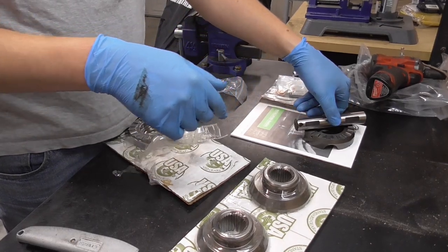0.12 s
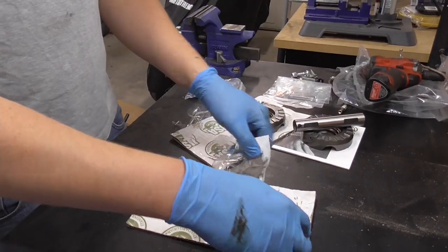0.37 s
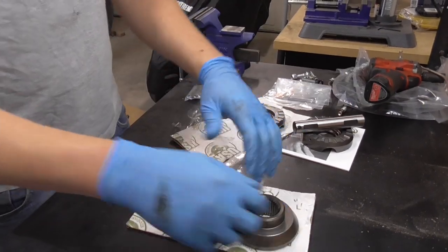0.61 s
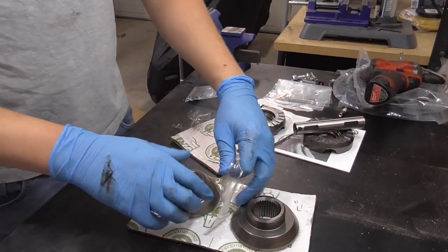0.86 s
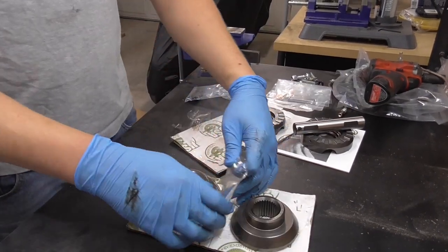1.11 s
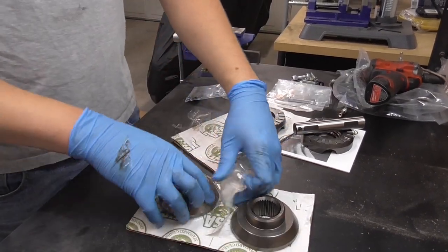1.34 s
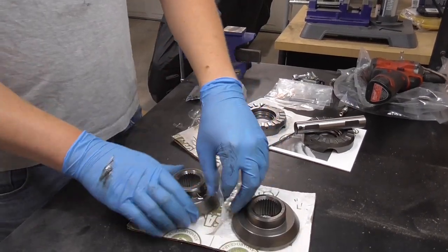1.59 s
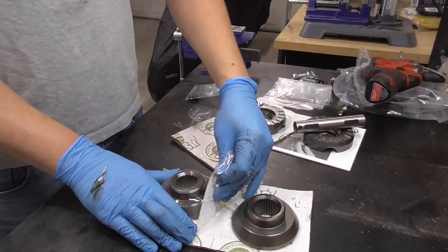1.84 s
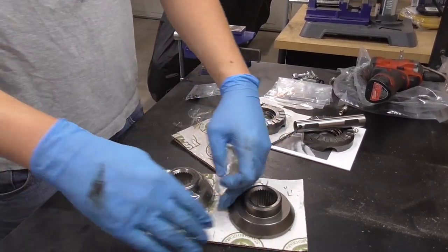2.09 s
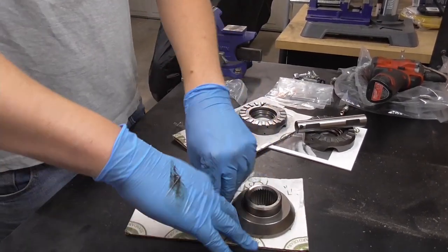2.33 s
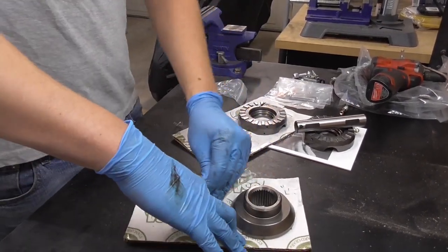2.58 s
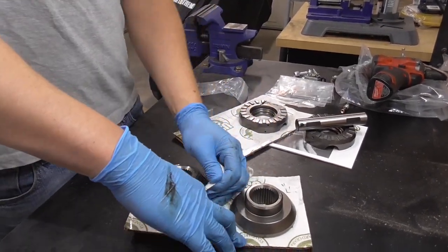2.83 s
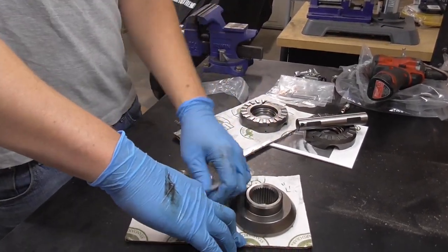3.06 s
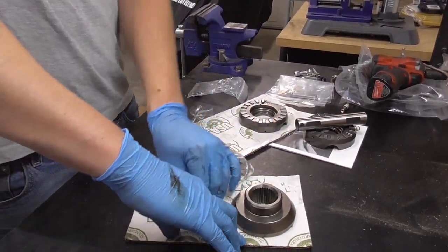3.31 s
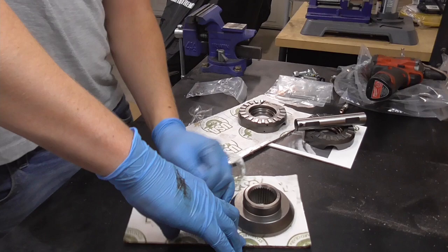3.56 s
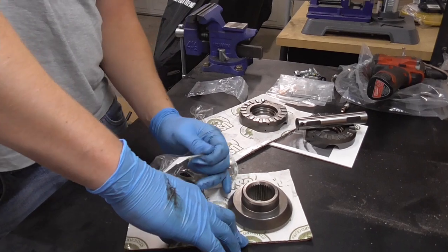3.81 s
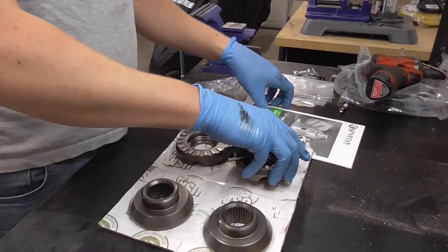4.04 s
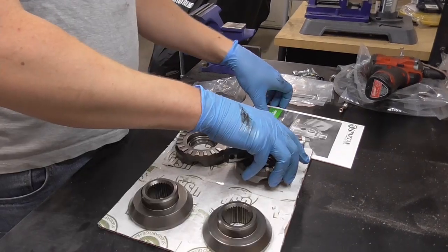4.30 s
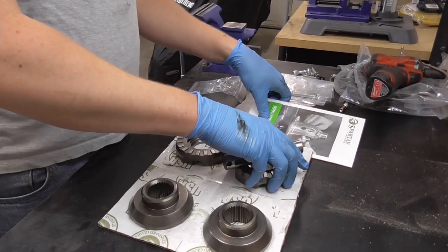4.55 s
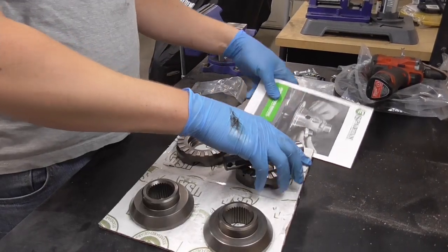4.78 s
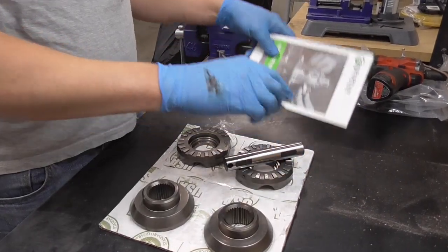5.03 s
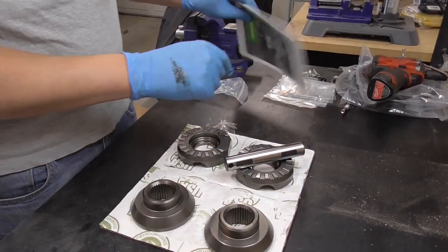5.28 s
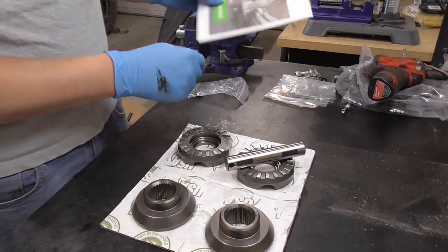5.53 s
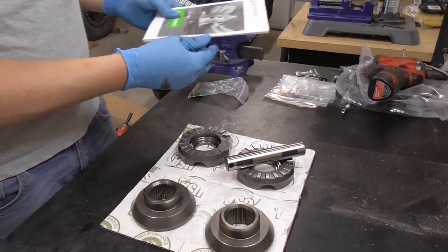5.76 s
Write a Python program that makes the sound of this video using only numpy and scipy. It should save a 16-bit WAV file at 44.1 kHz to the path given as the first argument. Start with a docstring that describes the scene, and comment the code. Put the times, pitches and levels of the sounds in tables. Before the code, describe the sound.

Close stereo recording in a quiet, humming workshop with a short echo. A faint paper slide, then heavy metal parts thump the bench. Stiff plastic film is tugged in bursts of crackle, sharp snaps and hollow card pops. Near four seconds a steel pin clinks on a gear; a hard, deep thump follows, then paper slides away and only air remains.

```python
"""Peeling film off steel gears

Gloved hands peel stiff plastic film off steel gears on a cardboard sheet on a workbench.
The film crackles (clumps of tiny noise puffs) and snaps (single puffs); the card rubs and pops
(short dying tones); gears thump the bench and a steel pin clinks on a gear (sums of dying sines).
A leaflet slides away as a hiss; a quiet workshop hums behind as coloured noise, with a short echo."""
import sys
import numpy as np
from scipy import signal
from scipy.fft import rfft, irfft, next_fast_len
from scipy.io import wavfile
from scipy.ndimage import uniform_filter1d

SR = 44100
rng = np.random.default_rng(int(sys.argv[2]) if len(sys.argv) > 2 else 0)


def boost_factor(decibels):
    """Convert a level in decibels to a linear amplitude factor."""
    exponent = np.asarray(decibels, float) / 20
    return 10 ** exponent


def put_to_file(sound):
    """Save the sound as 16-bit audio at rate SR, in the file named by the first command-line argument."""
    columns = np.atleast_2d(sound).T  # one column per channel
    safe = np.clip(columns, -1, 1)
    whole_steps = np.round(safe * 32767)
    wavfile.write(sys.argv[1], SR, whole_steps.astype(np.int16))


N = 259734
T = np.arange(N) / SR


def evened(x):
    """Scales to rms 1."""
    return x / np.sqrt(np.mean(x ** 2) + 1e-20)


def read(points, hz):
    """Reads a table over frequency, with straight lines on a log axis."""
    f, value = np.transpose(points)
    return np.interp(np.log(hz + 1), np.log(f + 1), value)


def coloured(x, points):
    """Filters along time by a spectrum table."""
    size = next_fast_len(N)
    gain = boost_factor(read(points, np.fft.rfftfreq(size, 1 / SR)))
    return irfft(rfft(x, size) * gain, size)[..., :N]


def sides(pan_db):
    """Gains of the left and right ports from left minus right in dB."""
    return boost_factor(np.multiply.outer([.5, -.5], pan_db))


def add(mix, s, sound):
    """Mixes a sound in at time s."""
    part = mix[..., round(s * SR):][..., :sound.shape[-1]]
    part += sound[..., :part.shape[-1]]


def ring(modes, length):
    """Sum of sines that die away, each losing 60 dB in its own t60."""
    t = T[:round(length * SR)]
    return sum(boost_factor(db - 60 * t / t60) * np.sin(2 * np.pi * hz * t) for hz, db, t60 in modes)


def grains(per_s, spread_db, clump_db, decay_s, same):
    """Tiny cracks of uneven size in clumps; each is a short dying puff, partly unlike at the two ports."""
    clumps = evened(uniform_filter1d(rng.standard_normal(N), 500))
    size = boost_factor(spread_db * np.minimum(rng.exponential(1, N), 4) + clump_db * clumps)
    starts = rng.random(N) < per_s / SR
    power = signal.lfilter([1], [1, -np.exp(-2 / (decay_s * SR))], size ** 2 * starts)
    both, left, right = rng.standard_normal((3, N))
    return np.sqrt(power) * (np.sqrt(same) * both + np.sqrt(1 - same) * np.array([left, right]))


def radiated(x):
    """A bench top pushes little air below its first mode."""
    return signal.sosfilt(signal.butter(4, 115, "high", fs=SR, output="sos"), x)


# colour of the workshop air: (f/Hz, level/dB per Hz)
HUM = [(15, -42), (25, -5.5), (134, 4.5), (516, -5), (607, -7), (1020, -11), (1790, -26), (5140, -32.5),
       (6050, -40), (6560, -32), (10100, -29), (14800, -28), (16000, -49)]
# how alike the air is at left and right: (f/Hz, likeness 0 to 1)
SAME = [(60, 0.98), (240, 0.79), (950, 0.43), (3770, 0.17), (15000, 0.099)]


def hum():
    """Steady workshop air: noise with a slow waver, more alike at the two ports in the bass."""
    left, other = (rfft(v) for v in rng.standard_normal((2, N)))
    same = read(SAME, np.fft.rfftfreq(N, 1 / SR))
    air = irfft([left, same * left + np.sqrt(1 - same ** 2) * other], N)
    waver_db = 0.26 * evened(uniform_filter1d(rng.standard_normal(N), 6000))
    return boost_factor(-55 + waver_db) * evened(coloured(air, HUM))


# how fast the workshop echo dies: (f/Hz, t60/s)
SHOP = [(150, 0.07), (600, 0.3), (2500, 0.53), (8000, 0.35), (15000, 0.035)]


def shop(x):
    """Sparse echoes of random sign, each band dying at its own speed."""
    taps = np.zeros((2, SR // 2))
    slots = np.arange(160, SR // 2 - 20, 20)  # one echo in every 20 samples
    at = slots + rng.integers(0, 20, (2, len(slots)))
    np.put_along_axis(taps, at, rng.choice([-1., 1.], at.shape), 1)
    hz, t, z = signal.stft(taps, SR, nperseg=256)
    tail = signal.istft(z * boost_factor(-60 * t / read(SHOP, hz)[:, None]), SR, nperseg=256)[1]
    return signal.fftconvolve(x[None], tail / np.linalg.norm(tail[0]), axes=1)[:, :N]


# deep pushes: (t/s, level/dB at the right port, f/Hz)
JOLTS = [(1.83, -52, 35), (4.612, -15, 36)]


def jolts():
    """One slow dying swing for each push, felt mostly at the right port."""
    out = np.zeros(N)
    for s, db, hz in JOLTS:
        add(out, s, ring([(hz, db, .06)], .2))
    return out * np.array([[.3], [1]])


# ways the bench top vibrates: (f/Hz, relative level/dB, t60/s)
BENCH = [(134.5, -9, 0.35), (171.8, 1, 0.13), (220, -7, 0.075), (236, -14, 0.59), (137, 5.5, 0.029),
         (252.8, 7, 0.044), (308, -4, 0.051), (366, -9.5, 0.082), (530, 0, 0.045), (664, -3, 0.018),
         (985, -24, 0.081), (1210, -20, 0.045)]


def bench_rumble():
    """Grains of rubbing and weight shake the bench top, which answers with its own modes."""
    rumble = signal.oaconvolve(grains(170, 4.25, 0.82, 0.014, 0.99), ring(BENCH, 0.53)[None])[:, :N]
    return evened(radiated(rumble))


# weight landing on the bench: (t/s, blow level/dB, contact/s, favoured f/Hz at the spot struck)
THUMPS = [(0.572, -9.5, 0.0024, 260), (0.579, -9.5, 0.0033, 209), (0.606, -13.5, 0.0035, 157),
          (0.618, -12, 0.0072, 134), (0.656, -25, 0.0036, 155), (0.671, -23.5, 0.0022, 200),
          (0.699, -20, 0.0049, 207), (0.715, -25.5, 0.0033, 232), (0.761, -32.5, 0.0024, 200),
          (1.825, -40, 0.0025, 166), (2.361, -33, 0.0052, 147), (3.075, -14.5, 0.0052, 160),
          (3.088, -28, 0.0018, 171), (3.137, -29.5, 0.0044, 136), (3.488, -30, 0.0051, 167),
          (3.76, -31, 0.0034, 137), (3.961, -33.5, 0.0034, 220), (4.003, -34.5, 0.0036, 250),
          (4.019, -34.5, 0.0027, 244), (4.036, -38, 0.0036, 199), (4.064, -34, 0.0017, 210),
          (4.105, -46, 0.003, 220), (4.21, -37, 0.0056, 160), (4.317, -44, 0.0035, 200),
          (4.343, -43, 0.0027, 230), (4.517, -29.5, 0.0033, 151), (4.542, -28, 0.0028, 194),
          (4.562, -19.5, 0.002, 161), (4.611, -5, 0.0036, 214), (4.625, -11, 0.0031, 220),
          (4.641, -27, 0.003, 135)]
# how far the left port runs ahead of the right: (f/Hz, phase/radians)
LEAD = [(60, .8), (150, .36), (300, .42), (1000, .3)]


def thumps():
    """A soft push through the card sets the bench top ringing; the spot struck favours some modes."""
    out = np.zeros(N)
    for s, db, contact, spot_hz in THUMPS:
        push = np.hanning(max(round(contact * SR), 4))
        edge = np.hanning(40)  # the steel rim lands harder than the body
        drive = np.concatenate([boost_factor(-17.0) * edge / edge.sum(), np.zeros(len(push))])
        drive[:len(push)] += push / push.sum()
        modes = [(hz, d - min(60.0 * np.log2(hz / spot_hz) ** 2, 12.0), t60) for hz, d, t60 in BENCH]
        add(out, s, boost_factor(db) * np.convolve(ring(modes, .6), drive))
    turn = np.exp(.5j * np.outer([1, -1], read(LEAD, np.fft.rfftfreq(N, 1 / SR))))
    return irfft(rfft(radiated(out)) * turn, N)


# contacts that damp earlier ringing: (t/s, level/dB before the share each part takes)
GRIP = [(3.964, -5), (3.972, -8), (4.02, -4), (4.064, -4), (4.145, -7), (4.18, -6), (4.232, -7), (4.36, -8),
        (4.41, -3), (4.47, -18), (4.56, -10), (4.6, -4), (4.612, -13), (4.636, -8), (4.712, -8)]


def struck(taps, modes, grip_share):
    """Each touch rings the families of modes by its own amounts; later contacts damp the ring."""
    swell_s, grip_s = .0012, .007  # a ring builds up, and a grip closes, over a moment
    out, t = np.zeros(N), T[:2 * SR]
    families = [ring(family, 2) * (1 - np.exp(-t / swell_s)) for family in modes]
    for s, *levels_db in taps:
        damped_db = sum(db * np.clip((s + t - at) / grip_s, 0, 1) for at, db in GRIP if at > s + .01)
        sound = sum(boost_factor(db) * family for db, family in zip(levels_db, families))
        add(out, s, boost_factor(grip_share * damped_db) * sound)
    return out


# pin against gear, push into each family of gear modes:
# (t/s, low ring level/dB, middle ring level/dB, high ring level/dB, short bright rings level/dB)
CLINKS = [(3.9601, -37, -40.5, -29.5, -26), (4.065, -53, -48, -40, -52), (4.085, -63, -70, -36.5, -70),
          (4.1814, -44.5, -43.5, -65, -64), (4.3625, -30.5, -54, -47, -43.5),
          (4.378, -34, -50, -40.5, -41.5), (4.528, -41, -52, -58, -56), (4.547, -32.5, -55, -50, -50),
          (4.5643, -60, -37.5, -36, -36), (4.592, -53, -50, -61, -57), (4.6411, -48, -33.5, -53, -60),
          (4.677, -58, -35.5, -60, -63)]
# gear modes by family, in that order: (f/Hz, relative level/dB, t60/s)
STEEL = [
    [(4504, 0, 0.4), (4535, -14, .15)],
    [(5667, 3, 0.17), (5610, -7, .1), (5040, -12, .08)],
    [(7697, 0, 0.5), (7752, -10, 0.3), (7950, -10, .2)],
    [(7325, -1, 0.15), (8866, -16, .06), (9400, -13, .04), (10480, -13, .05), (11080, -13, .06),
     (11330, 0, 0.12), (11500, 0, 0.04), (14050, -14, 0.13)],
]
# the pin itself answering: (t/s, low ring level/dB, middle rings level/dB, bright rings level/dB)
PIN_TAPS = [(3.9601, -60, -51, -50), (4.1814, -54, -52, -59), (4.547, -38, -54, -58),
            (4.5643, -30.5, -66, -35), (4.6411, -34, -45.5, -42), (4.677, -55, -68, -60)]
# pin modes by family, in that order: (f/Hz, relative level/dB, t60/s)
PIN = [
    [(4459, 0, .33)],
    [(6286, 0, .5), (6262, -6, 3.2)],
    [(7303, 0, .2), (8880, -9, .15), (11755, -2, .1)],
]


def clinks():
    """Gear and pin ring as dying sines; the level of the rings wavers a little at random."""
    waver_db = 1.2 * evened(uniform_filter1d(rng.standard_normal(N), 400))
    gear = struck(CLINKS, STEEL, 0.86)
    pin = struck(PIN_TAPS, PIN, 0.75)  # the pin is held less
    return (gear + pin) * boost_factor(waver_db)


# card buckling: (t/s, level/dB, pitch f/Hz, t60/s, left minus right level/dB)
POPS = [(0.521, -24, 610, 0.029, -2.5), (0.569, -20.5, 1390, 0.013, -3), (0.581, -13.5, 517, 0.051, 5),
        (0.584, -18.5, 800, 0.023, -6), (0.603, -19.5, 408, 0.026, -3), (0.64, -24, 536, 0.019, -0.5),
        (0.682, -25, 530, 0.058, 0), (0.684, -31, 1530, 0.019, -3), (0.696, -17, 1700, 0.0092, -7),
        (0.699, -23, 765, 0.013, -8), (0.723, -29, 530, 0.027, 2), (0.78, -26, 684, 0.012, -3),
        (0.852, -27.5, 1166, 0.043, -6), (0.869, -27.5, 560, 0.03, -4), (0.924, -19.5, 620, 0.01, -4),
        (0.948, -16, 604, 0.0089, -3), (0.958, -11, 950, 0.015, -8), (0.959, -15.5, 526, 0.018, -1),
        (1.275, -17.5, 1400, 0.0048, -10), (1.276, -14.5, 814, 0.0094, -5.5),
        (1.364, -26, 830, 0.019, -1.0), (1.599, -17, 1350, 0.011, -5), (1.664, -22.5, 1200, 0.014, -7),
        (1.678, -8, 1250, 0.0082, -11.5), (1.701, -11.5, 908, 0.02, -2.5), (1.823, -13, 585, 0.013, -6.5),
        (1.833, -16, 1940, 0.017, -9), (1.864, -18, 1150, 0.0088, -5), (2.074, -5, 1290, 0.0077, -3.5),
        (2.189, -10, 1260, 0.015, -6), (2.191, -21, 550, 0.027, -2), (2.22, -22, 530, 0.019, 1),
        (2.322, -20, 1070, 0.011, -8), (2.547, -28.5, 525, 0.019, -6), (2.609, -6.5, 1390, 0.0098, -3),
        (2.659, -22.5, 500, 0.036, 0), (2.687, -18.5, 1210, 0.012, -6), (2.855, -14.5, 1220, 0.014, -5),
        (2.892, -25.5, 1375, 0.022, -4.5), (3.073, -24.5, 500, 0.063, 1), (3.084, -19, 1000, 0.011, -6),
        (3.158, -14.5, 1360, 0.0078, 2), (3.188, -31, 1390, 0.034, -7), (3.373, -11.5, 1500, 0.0048, -6.5),
        (3.405, -11.5, 1370, 0.0075, -4), (3.431, -15.5, 1250, 0.0063, 1.5), (3.471, -18, 530, 0.028, 1.5),
        (3.494, -20, 610, 0.026, -4), (3.585, -8, 633, 0.017, -6.5), (3.585, -10, 1267, 0.017, -3.5),
        (3.648, -22, 1150, 0.0063, -2.5), (3.662, -11, 1300, 0.0079, -1), (3.673, -11, 1440, 0.015, -5.5),
        (3.683, -24.5, 1400, 0.007, -2), (3.693, -18.5, 1510, 0.007, -3), (3.764, -22, 1440, 0.018, -2.5),
        (3.96, -33, 1170, 0.051, -5), (3.964, -25, 1546, 0.025, -2), (4.181, -28.5, 1210, 0.035, -3),
        (4.185, -24.5, 1550, 0.011, -8), (4.277, -37.5, 1140, 0.031, -2), (4.542, -29, 1190, 0.021, -3),
        (4.611, -22, 650, .025, -3), (4.612, -24.5, 1990, 0.014, -3), (4.626, -9.5, 410, 0.015, -2),
        (5.025, -36, 824, 0.028, -4)]
# what pops leave ringing in the card, weaker far from their pitch: (f/Hz, level/dB, t60/s)
CARD_MODES = [(530, -20, .04), (760, -24, .025), (955, -21, .045), (1180, -23, .03), (1300, -23, .03),
              (1550, -25, .025)]


def pops():
    """The card buckles: a few cycles at one pitch, two weaker neighbours, a dull scratch, its own modes."""
    out, t = np.zeros((2, N)), T[:3000]
    length = len(t) / SR
    noise = rng.standard_normal((len(POPS), len(t)))
    spot_db = 4.0 * rng.standard_normal((len(POPS), len(CARD_MODES)))  # each spot favours other modes
    for (s, db, hz, t60, pan_db), a, spot in zip(POPS, noise, spot_db):
        buckle = ring([(hz, 0, t60), (hz * 0.673, -6, t60 * 0.42), (hz * 1.2, -5, t60 * 0.43)], length)
        modes = [(f, d + g - 14.0 * np.log2(f / hz) ** 2, w) for (f, d, w), g in zip(CARD_MODES, spot)]
        body = buckle + ring(modes, length)
        dull = signal.sosfilt(signal.butter(4, hz * 2.25, fs=SR, output="sos"), a)
        scratch = evened(dull) * boost_factor(-10.0 - 60 * t / t60)
        onset = 1 - np.exp(-t / 0.0012)
        add(out, s, boost_factor(db) * onset * (body + scratch) * sides(pan_db)[:, None])
    return radiated(out)


# colour of the rubbed card: (f/Hz, level/dB per Hz)
CARD = [(150, -40), (250, -9.5), (349, -2.5), (512, 9.5), (760, 2), (950, 7), (1200, 5.5), (1500, -0.5),
        (1900, -2), (3000, -9.5), (7000, -13)]


def card_rub():
    """Rubbed card: coarse grains, nearly alike at both ports."""
    return evened(coloured(grains(700, 3.5, 2.0, .004, .8), CARD))


# colour of the paper: (f/Hz, level/dB per Hz)
PAPER = [(700, -32), (1100, -8), (1700, 2), (2400, 0), (3480, 4), (11000, 6), (15400, 4), (16500, -60)]


def paper_hiss():
    """Sliding and flexing paper: many fine grains that blend into a hiss."""
    return evened(coloured(grains(2000, 2.6, 2.2, 0.0014, 0.3), PAPER))


def patchy(x):
    """Random patches of about 2 kHz by 40 ms brighten and dull the sound."""
    z = signal.stft(x, nperseg=256)[2]
    patches = rng.standard_normal(z.shape[:0:-1]).T
    patches = uniform_filter1d(patches, size=12, axis=0)
    patches = evened(uniform_filter1d(patches, size=14, axis=1))
    return evened(signal.istft(z * boost_factor(2.5 * patches), nperseg=256)[1][:, :N])


# colour of the film: (f/Hz, level/dB per Hz)
FILM = [(880, -22), (1500, -1), (1830, -17), (3410, -7.5), (4570, -8), (5700, -7), (11600, 0.5),
        (15200, -2), (15700, 9), (16500, -56)]


def film_crackle():
    """Stiff film gives a dense crackle with sparser, sharper ticks; its colour drifts in patches."""
    crackle = evened(grains(3000, 2.9, 1.5, 0.0012, 0.4))
    ticks = boost_factor(-3.5) * evened(grains(450, 3.3, 2.5, .0004, .5))
    return patchy(coloured(crackle + ticks, FILM))


def strokes(table):
    """Summed gains of treble and card rub: each stroke bites, swells to its top, slackens and is let go."""
    bite_db, slack_db = -14, -15  # a stroke starts and ends this far under its top
    outside_db = -120.2  # further drop 0.1 s before the bite or after letting go
    t, power = T[::32], 0
    for start, swell, fade, *top_db in table:
        shape_db = np.interp(t - start, [-.1, 0, swell, swell + fade, swell + fade + .1],
                             [bite_db + outside_db, bite_db, 0, slack_db, slack_db + outside_db])
        power = power + boost_factor(np.add.outer(top_db, shape_db)) ** 2
    return [np.interp(T, t, np.sqrt(p)) for p in power]


# hands resting and shifting on the work: (t/s, faint rustle level/dB, weight on card and bench level/dB)
HANDS = [(0.0, -60.5, -46), (0.23, -57.5, -44.5), (0.33, -65, -57.5), (0.42, -65, -46.5), (0.53, -61, -54),
         (0.6, -62, -39.5), (0.77, -70, -38.5), (0.82, -41.5, -49), (1.02, -59, -65), (1.2, -47.5, -47.5),
         (1.4, -65, -52.5), (1.84, -56, -44), (1.89, -59, -60), (2.2, -34, -45.5), (2.42, -70, -46),
         (2.75, -59, -53), (3.05, -49.5, -53), (3.1, -44.5, -49), (3.4, -73, -47), (3.64, -45.5, -48),
         (3.78, -57, -44), (3.901, -49.5, -48), (3.92, -109, -61), (3.97, -53, -46.5), (4.1, -60.5, -43.5),
         (4.35, -63, -52), (4.49, -64, -51.5), (4.57, -38.5, -32.5), (4.7, -54, -38.5), (4.9, -58, -53),
         (5.049, -80, -52.5), (5.25, -62, -60.5), (5.42, -70.5, -59.5), (5.89, -80, -59)]
# tugs at the film: (start t/s, swell/s, fade/s, top crackle level/dB, top card rub level/dB)
TUGS = [(0.384, 0.012, 0.0068, -33, -43.5), (0.491, 0.035, 0.087, -43.5, -45.5),
        (0.582, .01, 0.05, -66, -55), (0.62, 0.0019, 0.035, -36.5, -63), (0.68, 0.016, 0.054, -37, -55),
        (0.75, 0.017, 0.014, -34, -42), (0.805, 0.018, 0.023, -50, -38.5), (0.846, 0.034, 0.1, -31, -33),
        (0.975, 0.035, 0.19, -61, -45), (1.235, 0.025, 0.12, -38, -43), (1.391, 0.059, 0.16, -34.5, -37),
        (1.589, 0.032, 0.058, -37, -44), (1.66, 0.019, 0.046, -32, -34.5), (1.741, 0.087, 0.056, -27, -36),
        (1.879, 0.013, 0.16, -31.5, -42.5), (2.019, 0.031, 0.11, -29, -37),
        (2.17, 0.011, 0.098, -41, -37.5), (2.35, 0.0024, 0.051, -35, -43.5),
        (2.438, 0.091, 0.067, -22.5, -33.5), (2.649, 0.0069, 0.082, -33, -33),
        (2.72, 0.026, 0.083, -34.5, -42), (2.82, 0.027, 0.094, -31.5, -40),
        (2.94, 0.038, 0.049, -30.5, -41), (3.07, 0.0034, 0.11, -38, -37), (3.15, 0.025, 0.37, -42.5, -40.5),
        (3.428, 0.063, 0.066, -29, -30), (3.55, 0.036, 0.06, -37.5, -36), (3.658, 0.0043, 0.16, -32.5, -31)]
# paper sliding and flexing: (start t/s, swell/s, fade/s, top hiss level/dB, top card rub level/dB)
SLIDES = [(0.228, 0.049, 0.037, -41, -68), (4.52, 0.016, 0.028, -54, -41),
          (4.755, 0.047, 0.039, -41.5, -49), (4.86, 0.092, 0.11, -42.5, -49.5),
          (5.016, 0.012, 0.0086, -48, -47.5), (5.15, 0.0084, 0.018, -57, -72),
          (5.3, 0.044, 0.044, -68, -60.5)]


def handling():
    """Film crackle, paper hiss, card rub and bench rumble follow the strokes and the weight of the hands."""
    film_gone_s = 3.93  # after this only paper rustles under the hands
    s, *columns = np.transpose(HANDS)
    rustle, weight = (boost_factor(np.interp(T, s, c)) for c in columns)
    (crackle, tug_rub), (hiss, slide_rub) = strokes(TUGS), strokes(SLIDES)
    rub = np.hypot(tug_rub, slide_rub)
    # hypot adds the powers of two causes
    film_gain = np.hypot(crackle, rustle * (T < film_gone_s))
    paper_gain = np.hypot(hiss, rustle * (T >= film_gone_s))
    card_gain = np.hypot(rub, boost_factor(-9.5) * weight)  # weight also rubs the card
    bench_gain = np.hypot(weight, boost_factor(-27) * rub)  # rubbing also shakes the bench
    treble = paper_hiss() * paper_gain + film_crackle() * film_gain
    card = card_rub() * card_gain
    return treble * sides(-3.5)[:, None] + card * sides(-1.5)[:, None] + bench_rumble() * bench_gain


# creases flipping and hard edges ticking:
# (t/s, level/dB, centre f/Hz, duller puff's relative level/dB before a fixed cut, left minus right level/dB)
SNAPS = [(0.1494, -34, 10900, -17, -3), (0.389, -35, 11400, -1.5, -7.5), (0.521, -35, 9300, -3, -5),
         (0.5732, -18, 8700, -3.5, -5.5), (0.624, -25.5, 9100, -8, 3), (0.6848, -39.5, 10400, -7, -5),
         (0.8497, -15, 12500, -22, -6), (0.87, -25, 10050, -10, 0), (0.9045, -19, 11400, -12, -6),
         (0.932, -12.5, 9200, -16, -2), (0.9575, -27.5, 11100, 13, -5), (0.997, -34, 12000, -20, -4),
         (1.0924, -14, 11100, -9.5, -4.5), (1.1655, -37, 9000, -6, -4), (1.1879, -21.5, 10000, -13, -3),
         (1.248, -35, 8000, -11, -6), (1.331, -17, 11500, -16, -2), (1.3629, -20, 10200, -10.5, -2),
         (1.3962, -25, 10500, -2, -1), (1.43, -21, 10000, -7.5, -1), (1.5638, -25, 11700, -22, -7),
         (1.597, -22, 12300, -4.5, -1), (1.682, -15.5, 11600, -5, 6.5), (1.701, -20, 9850, -3, -6),
         (1.836, -12.5, 8950, -5.5, -3), (1.8862, -16, 11900, -36, -7), (2.0095, -25, 11300, -25, -5),
         (2.0278, -19, 11700, -13, 1), (2.066, -16, 11000, -26, 2), (2.1894, -42, 11100, 5.5, -27),
         (2.238, -17, 9400, -48, -2), (2.3625, -19.5, 10000, -8.5, -2.5), (2.4471, -18.5, 8900, -29, 3),
         (2.455, -21, 10300, -32, -19.5), (2.47, -20.5, 9800, -22, 2), (2.5025, -13, 11200, -29, -12),
         (2.5472, -11.5, 10200, -9.5, -5), (2.611, -18.5, 7650, -5.5, -2), (2.6369, -26, 11600, -22, -2),
         (2.654, -39, 10200, 18, -8), (2.8558, -20.5, 8750, 1.5, -6), (2.892, -14.5, 9300, -8, -3),
         (2.946, -19.5, 10900, -25.5, -3), (3.0743, -27, 8780, -5.5, -0.5), (3.1576, -46.5, 8000, 31.5, -4),
         (3.303, -29.5, 9950, -4, -7), (3.373, -40.5, 11300, 16, -2), (3.405, -21, 11000, 0.5, -1.5),
         (3.4324, -10.5, 11000, -6, -3.5), (3.48, -17.5, 11500, -15, -3), (3.493, -16.5, 10500, -9, -1),
         (3.516, -21.5, 11500, -11.5, -2), (3.6618, -4.5, 12300, -18.5, -2), (3.669, -17, 8740, 1.5, 1),
         (3.6847, -36, 10400, 12, 0.5), (3.961, -17, 10600, -6.5, -4), (4.0633, -40, 9000, 10, -6),
         (4.102, -39, 8100, -1, -8), (4.3618, -49, 11400, 17, -7), (4.4876, -38.5, 11600, -2, -6.5),
         (4.528, -36.5, 8500, 6.5, -4), (4.5638, -26, 11700, 5.5, -4), (4.594, -32, 11700, -8, -4),
         (4.632, -39, 11000, 0, 1), (4.6405, -37.5, 9000, 15.5, -3.5), (4.761, -29, 10700, -2, -3),
         (4.789, -39, 9000, -7, -4), (4.88, -39.5, 8950, 4, 1), (4.915, -36.5, 8510, -8, 0),
         (4.93, -40, 9700, -2, -3), (4.956, -36.5, 9050, -19, -7), (4.978, -36, 9000, -2, -3),
         (5.0249, -27.5, 9700, -27, -6), (5.031, -35, 10000, -19, -6), (5.541, -52.5, 10400, -23, -12)]


def snaps():
    """A crease flips: a sharp puff around its own pitch, a duller one under it, a short flutter."""
    out, t = np.zeros((2, N)), T[:1300]
    noise = rng.standard_normal((len(SNAPS), 2, 3, len(t)))
    ports = noise[:, :, :1] + 0.91 * noise[:, :, 1:]  # shared noise plus a part of each port's own
    onset = 1 - np.exp(-t / .0001)
    bright, dull = (onset * (np.exp(-t / .0006) + tail * np.exp(-t / .007)) for tail in (.12, .28))
    low_band = signal.butter(1, [2200, 6500], "band", fs=SR, output="sos")
    for (s, db, hz, low_db, pan_db), (a, b) in zip(SNAPS, ports):
        top_band = signal.butter(1, [hz * 0.87, min(hz * 1.2, 19000)], "band", fs=SR, output="sos")
        sharp_puff = evened(signal.sosfilt(top_band, a)) * bright
        dull_puff = boost_factor(low_db - 3) * evened(signal.sosfilt(low_band, b)) * dull
        add(out, s, boost_factor(db) * (sharp_puff + dull_puff) * sides(pan_db)[:, None])
    return out


def scene():
    """All sources near the microphone, the room echo of handling, snaps, pops and rings, and the hum."""
    near, rings = handling() + snaps() + pops(), clinks()
    # thin rings stir the room less than wide crackle
    echo = boost_factor(-11.0) * shop(near.mean(0) + boost_factor(-9) * rings)
    bench = thumps() * sides(-0.13)[:, None]
    return near + rings * sides(-5.5)[:, None] + bench + echo + jolts() + hum()


def band_limit(x):
    """A steep low-pass at the top of the band."""
    return signal.sosfilt(signal.butter(12, 16810, fs=SR, output="sos"), x)


# colour of the microphone: (f/Hz, level/dB)
MIC = [(20, -9), (60, -2), (12000, 0.5), (15000, -11.5), (16000, -27), (17000, -37)]


def record(dry):
    """The microphone colours the whole scene."""
    mix = coloured(dry, MIC)
    return band_limit(mix)


dry = scene()
out = record(dry)
put_to_file(out)
```